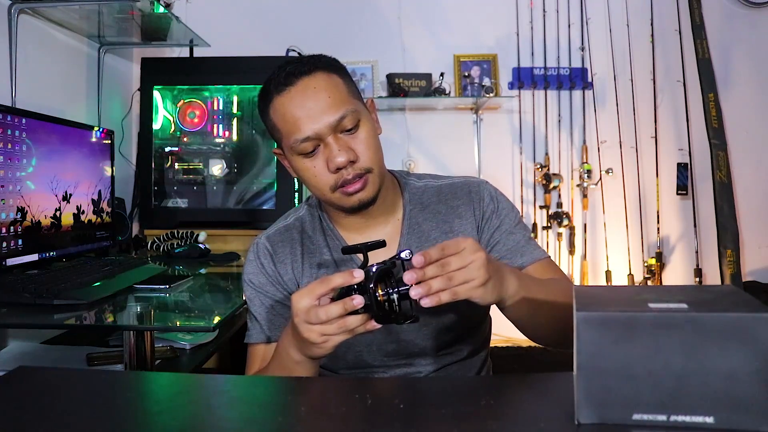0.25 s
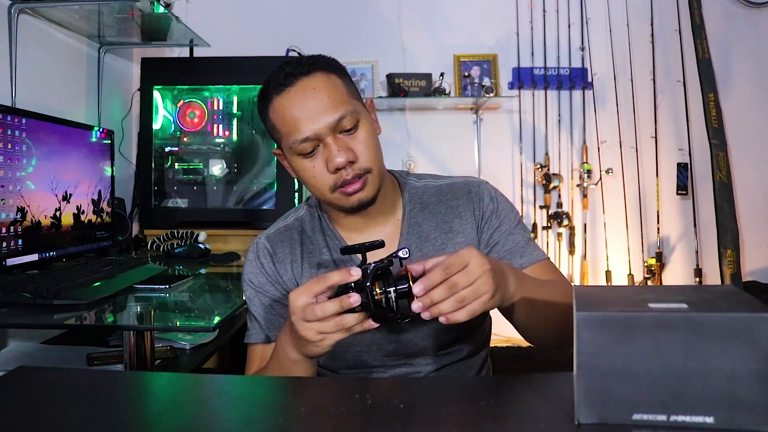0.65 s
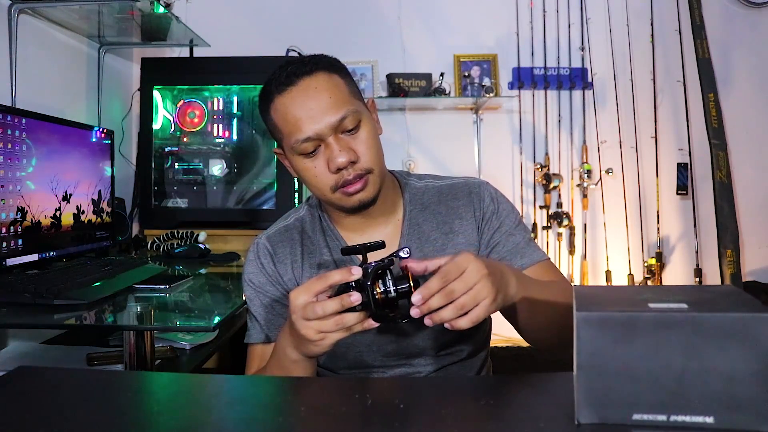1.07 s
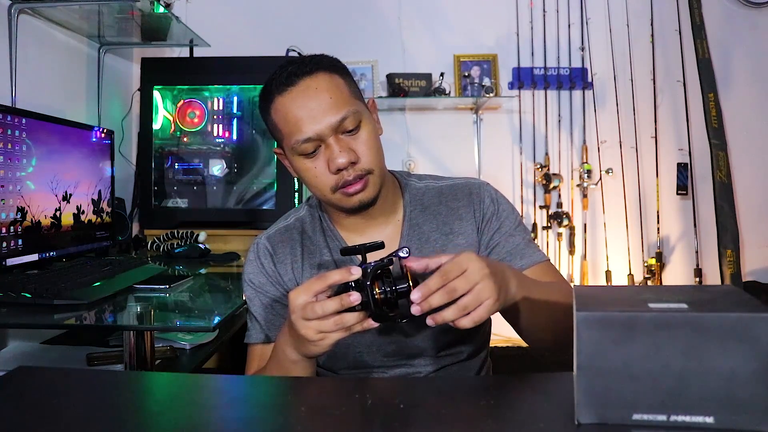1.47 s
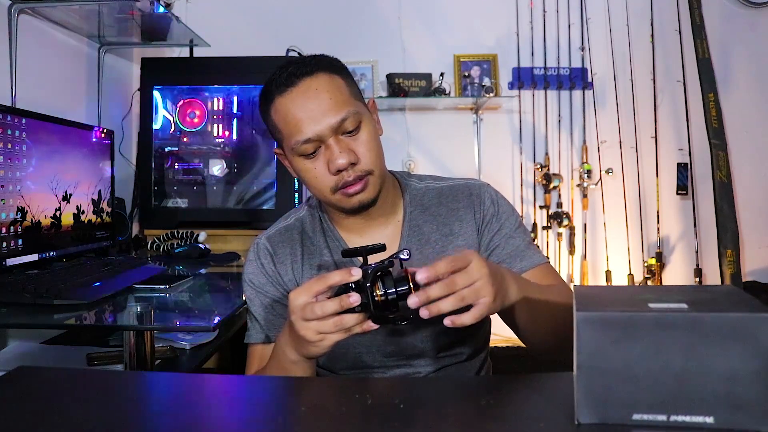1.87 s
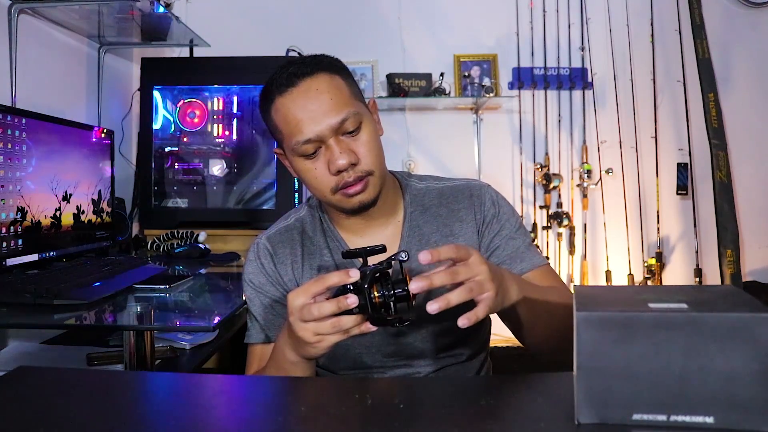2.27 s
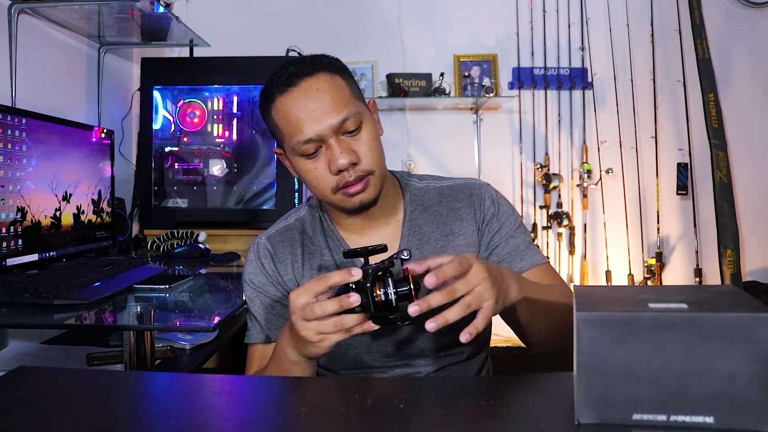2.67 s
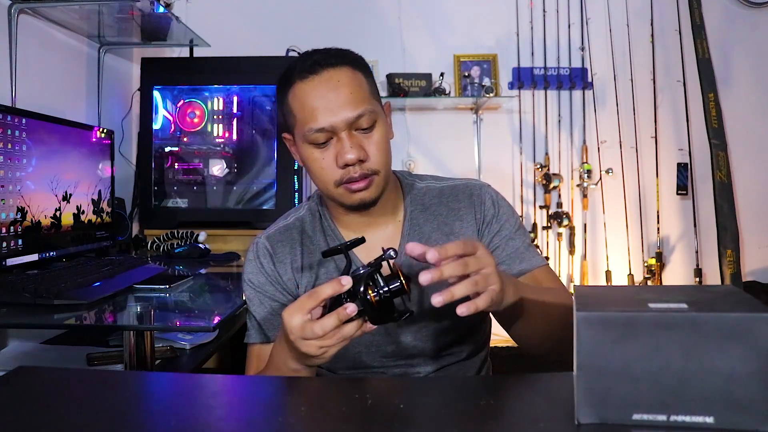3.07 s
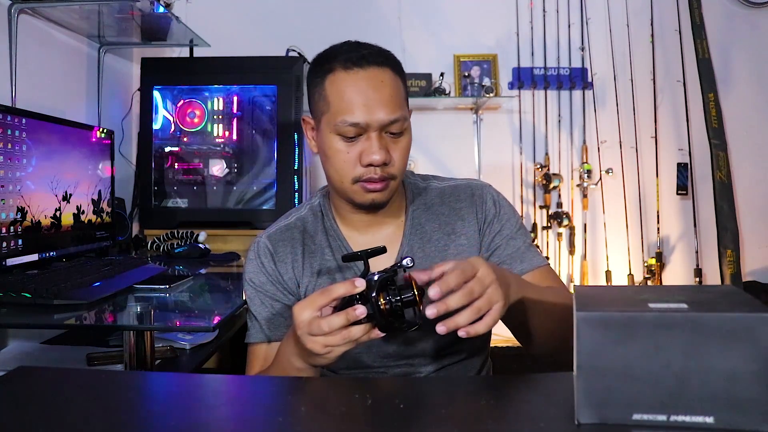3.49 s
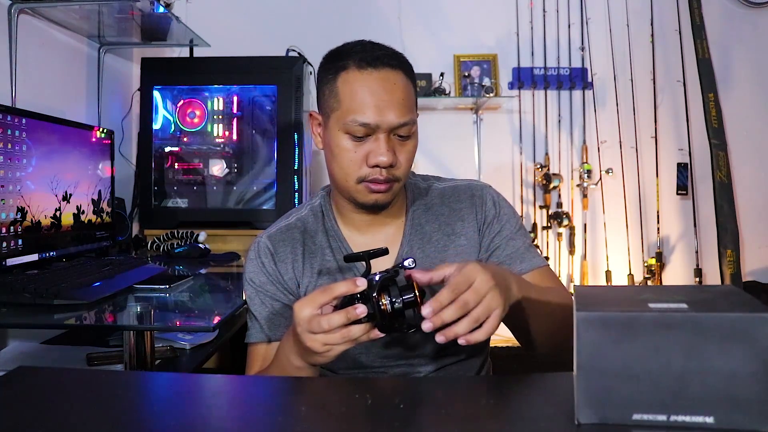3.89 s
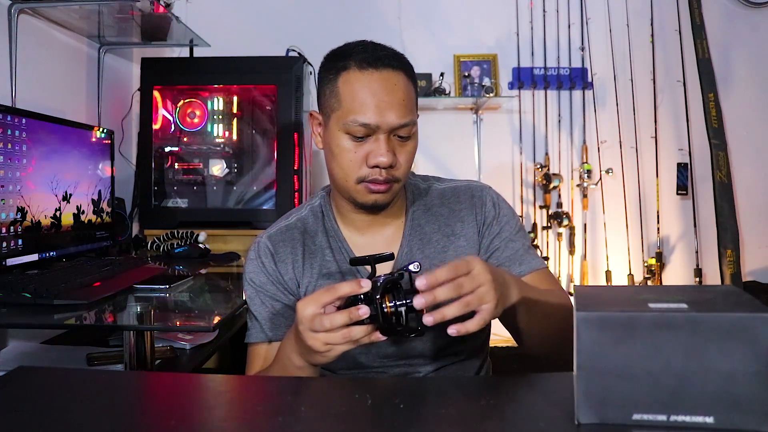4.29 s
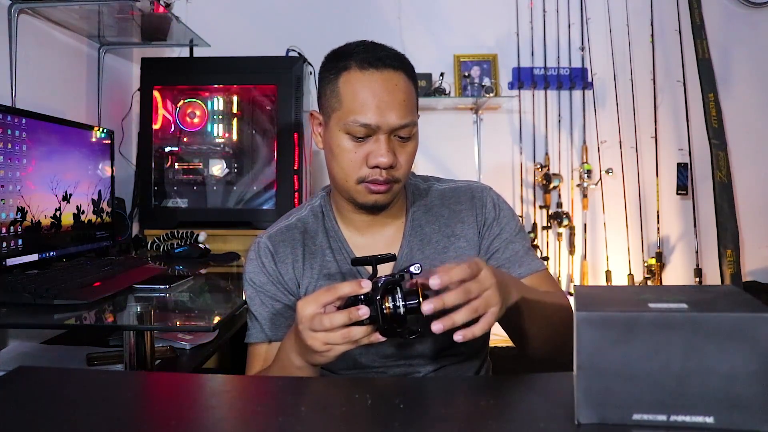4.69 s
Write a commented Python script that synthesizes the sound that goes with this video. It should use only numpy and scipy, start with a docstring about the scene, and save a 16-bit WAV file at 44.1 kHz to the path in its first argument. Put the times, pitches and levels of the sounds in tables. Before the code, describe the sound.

A fishing reel's drag clicks in short, uneven runs with a bright metallic ring, over a soft computer fan hum.

```python
"""Spinning reel drag clicks

A reel's spool is turned by hand in short twists, close to the microphone in a small room.
Each twist takes up the play with faint ticks, then the drag's clicker spring snaps over up to
five teeth and sets the metal spool ringing. Computer fans hum behind.
A compressor ducks briefly after the loud clicks."""
import sys
import numpy as np
from scipy import signal
from scipy.fft import rfft, irfft
from scipy.io import wavfile

SR = 44100
rng = np.random.default_rng(int(sys.argv[2]) if len(sys.argv) > 2 else 0)


def wav_out(sig):
    """Save sig, one row per channel (or a flat mono array), as 16-bit PCM at SR to the path in sys.argv[1]."""
    wavfile.write(sys.argv[1], SR, np.round(np.clip(np.atleast_2d(sig).T, -1, 1) * 32767).astype(np.int16))


N = 218030

# spring slips off a tooth: t/s, snap level/dB, spring t60/s
SNAPS = [(0.168, -19.5, 0.062), (0.2007, -30, .06), (0.2577, -40, .025), (0.288, -56, 0.019),
         (0.3152, -26.5, 0.028), (0.791, -24.5, 0.052), (0.827, -30, 0.037), (0.8524, -31, 0.02),
         (0.8587, -24, 0.061), (0.896, -30, 0.049), (1.2875, -14.5, 0.064), (1.3144, -15, .07),
         (1.3437, -12, 0.056), (1.3877, -17.5, 0.037), (1.6649, -10, 0.083), (1.6828, -11.5, .06),
         (1.7012, -12.5, .025), (1.9695, -14, 0.017), (1.9951, -16, 0.046), (2.0126, -14.5, 0.051),
         (2.0378, -18.5, 0.11), (2.3046, -15.5, 0.066), (2.3254, -18, 0.076), (2.398, -23.5, 0.053),
         (2.5747, -19.5, 0.028), (2.5895, -20, 0.031), (2.608, -25, 0.028), (2.843, -28, 0.024),
         (2.8514, -21, 0.042), (2.875, -17.5, .08), (2.8914, -17.5, 0.13), (2.912, -31.5, 0.077),
         (3.4119, -30.5, 0.061), (3.7487, -9, 0.029), (3.7652, -12, 0.051), (3.784, -10, .025),
         (3.8229, -13, 0.086), (4.0742, -14, .025), (4.089, -12.5, 0.13), (4.104, -12, .06),
         (4.1269, -18, 0.039), (4.375, -28, 0.034), (4.4011, -24, 0.11), (4.4191, -24, 0.033),
         (4.443, -33, 0.04), (4.6887, -33, 0.14), (4.7107, -25.5, 0.021), (4.732, -44, .03)]
# hand twists, and how loudly spring, lip and skirt ring in each:
# t/s, tick level/dB, spring gain/dB, lip level/dB, skirt gain/dB
TWISTS = [(0.146, -47.5, 0, -62, -3), (0.765, -48, -2, -43, -0.5), (1.239, -48, 5.5, -45, 2),
          (1.634, -41.5, -3.5, -47, -1.5), (1.95, -58, 3, -37, -4), (2.276, -40, 0, -29.5, 3.5),
          (2.548, -43.5, 4, -46, 3), (2.83, -56, 0, -33.5, -1), (3.395, -49, -9.5, -54, -0.5),
          (3.721, -35, 0, -49, 2.5), (4.045, -37.5, 2, -40, -2.5), (4.368, -43.5, 0.5, -54, -3.5),
          (4.666, -41.5, 2.5, -46, 1.5)]
# damped reel resonances, in every contact: f/Hz, width/Hz, relative level/dB
BODY_MODES = [(2225, 570, -26.5), (2640, 560, -13), (4360, 330, -20), (5060, 350, -23), (7020, 220, -8),
              (7700, 490, -8.5), (8530, 190, -18), (9080, 140, -4.5), (10260, 170, -2), (10750, 400, -2),
              (11460, 220, -8.5), (12067, 290, 3), (12300, 230, -1.5), (13600, 900, -33),
              (13970, 230, -0.5), (16000, 170, -8.5)]
# high spool modes: f/Hz, level re snap/dB, t60/s
SPOOL_MODES = [(7150, -50, 0.14), (9800, -25.5, 0.3), (11990, -38, 0.09), (12000, -32, 0.14),
               (14270, -31, 0.2)]
# lowest mode of the spool skirt, a close pair: f/Hz, relative level/dB
SKIRT_MODES = [(4067, -39.5), (4085, -45.5)]
# fan air spectrum: f/Hz, relative density/dB
FAN_AIR = [(15, -65), (25, -13), (64, -7.5), (119, -4), (140, -12.5), (169, 1), (193, -7), (281, -12.5),
           (582, -17), (804, -19.5), (1380, -19.5), (1570, -22.5), (2060, -24), (2490, -26), (15500, -34)]
# fan air stereo width: f/Hz, side re mid/dB
FAN_SIDE = [(60, -1), (110, -11), (200, -7), (380, -1.5), (700, -2), (1290, -4), (2380, -3), (4400, -2.5),
            (8120, -3), (15000, -2.5)]
# fan hum lines: f/Hz, width/Hz, relative level/dB
FAN_HUM = [(67.3, 9.2, -55.5), (123, 15, -62), (167.9, 3.6, -57.5), (638, 42, -66)]


def from_db(db):
    return 10 ** (np.asarray(db) / 20)


def unit_rms(x):
    return x / np.sqrt(np.mean(x ** 2) + 1e-20)


def spectrum_gain(points, hz):
    points_hz, db = np.transpose(points)
    return from_db(np.interp(np.log(hz + 1e-9), np.log(points_hz), db))


def seconds(samples):
    return np.arange(samples) / SR


def add(track, at_s, sound):
    i = round(at_s * SR)
    track[i:i + len(sound)] += sound[:N - i]


def decay(t, t60_s):
    return np.exp(-np.log(1000) * t / t60_s)


def ring(t, hz, t60_s):
    return np.sin(2 * np.pi * hz * t) * decay(t, t60_s)


def stereo(mid, side):
    return np.array([mid + side, mid - side])


def resonance(x, hz, width_hz):
    """Two-pole band-pass, unity peak gain."""
    r = np.exp(-np.pi * width_hz / SR)
    feedback = [1, -2 * r * np.cos(2 * np.pi * hz / SR), r * r]
    return signal.lfilter(np.array([1, 0, -1]) * (1 - r * r) / 2, feedback, x)


def twists():
    """Each twist's row with its run of snaps."""
    ends_s = [row[0] for row in TWISTS[1:]] + [N / SR]
    for row, end_s in zip(TWISTS, ends_s):
        yield row, [snap for snap in SNAPS if row[0] <= snap[0] < end_s]


def contact(brightness, chatter_s, bounce_db, bounce_s=0.0019, vary_db=3, pivot_hz=9500, low_cut_hz=1950):
    """Metal hits metal, chatters and bounces once; rms 1 over the first 5 ms."""
    t = seconds(1024)
    since_bounce_s = t - bounce_s * rng.uniform(0.72, 1.15)
    bounce = (since_bounce_s > 0) * np.exp(-np.abs(since_bounce_s) / chatter_s)
    force = (np.exp(-t / chatter_s) + from_db(bounce_db) * bounce) * rng.standard_normal(len(t))
    out = 0
    for hz, width_hz, db in BODY_MODES:
        tilt_db = 1.09 * brightness * np.tanh(2 * np.log2(hz / pivot_hz))
        out += from_db(db + tilt_db + rng.normal(0, vary_db)) * unit_rms(resonance(force, hz, width_hz))
    # a small body radiates little bass
    out = signal.sosfilt(signal.butter(4, low_cut_hz, "high", fs=SR, output="sos"), out)
    return out / np.sqrt(np.mean(out[:SR // 200] ** 2))


def snaps(hard_db=-14.5, brightness_per_db=1.88):
    """The spring tip lands on the next tooth; hard landings are brighter."""
    out = np.zeros(N)
    for at_s, db, _ in SNAPS:
        brightness = -0.5 + brightness_per_db * max(db - hard_db, 0)
        add(out, at_s, from_db(db) * contact(brightness, chatter_s=0.0012, bounce_db=-9))
    return out


def spring(spring_hz=9614, spread_hz=14, base_db=-7.5, snap_share=0.35, ramp_s=0.001,
           twang_db=-7.5, sharp_hz=60, twang_t60_s=0.028, lip_hz=10250, lip_t60_s=0.21):
    """The spring twangs, sharp at first, and rings with the spool's lip until the next tooth stops it."""
    out, t = np.zeros(N), seconds(SR // 2)
    attack = 1 - np.exp(-t / ramp_s)
    for (_, _, spring_gain_db, lip_db, _), run in twists():
        stops_s = [snap[0] for snap in run[1:]] + [N / SR]
        for (at_s, db, t60_s), stop_s in zip(run, stops_s):
            hz = spring_hz + rng.normal(0, spread_hz)  # tip seats differently on each tooth
            length_db = -2.5 * np.log2(t60_s / twang_t60_s)  # longer rings are softer
            gain = from_db(base_db + spring_gain_db + snap_share * db + length_db)
            twang = from_db(twang_db) * ring(t, hz + sharp_hz, twang_t60_s)
            lip = from_db(lip_db) * ring(t, lip_hz, lip_t60_s)
            tone = gain * (ring(t, hz, t60_s) + twang) + lip
            gate = np.clip((stop_s - at_s - t) / ramp_s + 1, 0, 1)
            add(out, at_s, tone * gate * attack)
    return out


def spool(vary_db=0.5, max_lag_s=0.0017):
    """Each snap strikes the spool's high modes with slightly varied strengths."""
    out, t = np.zeros(N), seconds(SR // 2)
    modes = np.array([from_db(db) * ring(t, hz, t60_s) for hz, db, t60_s in SPOOL_MODES])
    for at_s, db, _ in SNAPS:
        lag_s = rng.uniform(0, max_lag_s)
        gains = from_db(db + rng.normal(0, vary_db, len(modes)))
        add(out, at_s + lag_s, gains @ modes)
    return out


def skirt(snap_share=0.46, swell_s=0.014, t60_s=0.48):
    """The skirt gathers energy snap by snap and rings like a small bell; its two modes beat."""
    energy, t = np.zeros(N), seconds(SR // 2)
    pulse = (1 - np.exp(-t / swell_s)) * decay(t, t60_s)
    since_snap_s = seconds(N)
    for (*_, skirt_gain_db), run in twists():
        for at_s, db, _ in run:
            add(energy, at_s, (from_db(snap_share * db + skirt_gain_db) * pulse) ** 2)
            i = round(at_s * SR)
            since_snap_s[i:] = seconds(N - i)
    # each snap restarts the pair in antiphase
    pair = sum(sign * from_db(db) * np.sin(2 * np.pi * hz * since_snap_s)
               for sign, (hz, db) in zip((1, -1), SKIRT_MODES))
    return np.sqrt(energy) * pair


def scrapes(level_db=-44.5, vary_db=1.5, climb_s=0.012, grains=3, max_gap_s=0.05):
    """Between close snaps the spring tip grits up the tooth's flank."""
    out = np.zeros(N)
    snaps_s = np.array(SNAPS)[:, 0]
    for at_s in snaps_s[1:][np.diff(snaps_s) < max_gap_s]:
        leads_s = rng.uniform(0, climb_s, grains)
        for lead_s, db in zip(leads_s, rng.normal(level_db, vary_db, grains)):
            grain = contact(brightness=-7, chatter_s=0.0019, bounce_db=-9.5)
            add(out, at_s - lead_s, from_db(db) * grain)
    return out


def play_ticks(seat_share=0.55, seat_gain_db=-2, let_go_after_s=0.085, let_go_db=-53):
    """Dull ticks of the spool on its shaft: gripped, seated, let go."""
    out = np.zeros(N)
    for (start_s, tick_db, *_), run in twists():
        seat_s = start_s + seat_share * rng.uniform(0.8, 1.2) * (run[0][0] - start_s)
        let_go_s = run[-1][0] + let_go_after_s * rng.uniform(0.8, 1.3)
        for at_s, db in [(start_s, tick_db), (seat_s, tick_db + seat_gain_db), (let_go_s, let_go_db)]:
            add(out, at_s, from_db(db) * contact(brightness=-13.5, chatter_s=0.0017, bounce_db=0))
    return out


def off_axis(x, lead_s=5e-6, shade_db=-1, shade_hz=12000):
    """Sound reaches the left capsule earlier but duller."""
    hz = np.fft.rfftfreq(N, 1 / SR)
    split = np.array([[0.5], [-0.5]])
    arrival = np.exp(2j * np.pi * hz * lead_s * split)
    shade = from_db(shade_db * (hz / shade_hz) ** 2 * split)
    return irfft(rfft(x) * arrival * shade, N)


def reflections(x, wet_db, t60_s, side_db, first_s, cutoff_hz):
    """Dense echoes, similar at both capsules; air and walls absorb the top."""
    t = seconds(SR // 2)
    mid, side = rng.standard_normal((2, len(t))) * decay(t, t60_s) * (t > first_s)
    response = stereo(mid, from_db(side_db) * side) / np.sqrt(np.sum(mid ** 2))
    response = signal.sosfilt(signal.butter(2, cutoff_hz, fs=SR, output="sos"), response)
    return from_db(wet_db) * signal.fftconvolve(x[None], response, axes=1)[:, :N]


def fans(air_db=-49, hum_gain_db=-0.5, hum_side_db=-10, left_re_right_db=-1.5):
    """Diffuse rush of air with wavering hum lines."""
    hz = np.fft.rfftfreq(N, 1 / SR)
    mid, side = rfft(rng.standard_normal((2, N))) * spectrum_gain(FAN_AIR, hz)
    mid, side = irfft(mid, N), irfft(side * spectrum_gain(FAN_SIDE, hz), N)
    out = from_db(air_db) * stereo(mid, side) / np.std(mid)
    for line_hz, width_hz, db in FAN_HUM:
        line = 1 / (1 + ((hz - line_hz) / width_hz) ** 2)
        mid, side = unit_rms(irfft(rfft(rng.standard_normal((2, N))) * line, N))
        out += from_db(db + hum_gain_db) * stereo(mid, from_db(hum_side_db) * side)
    return out * from_db([[left_re_right_db / 2], [-left_re_right_db / 2]])


def scene():
    """Close reel, desk and room echoes, fans behind."""
    contacts = snaps() + scrapes() + play_ticks()
    spring_ring, spool_ring = spring(), spool()
    direct = off_axis(contacts + spring_ring + spool_ring + skirt())
    desk = reflections(contacts, wet_db=-10.5, t60_s=0.04, side_db=-12, first_s=0.0016, cutoff_hz=12900)
    room_send = contacts + from_db(-3.5) * spring_ring + spool_ring
    room = reflections(room_send, wet_db=-17.5, t60_s=0.33, side_db=-4, first_s=0.0089, cutoff_hz=13300)
    return direct + desk + room + fans()


def record(dry, threshold_db=-15, slope=0.31, release_db_per_s=330, attack_s=0.0021, cutoff_hz=15900):
    """A compressor passes each snap and ducks what follows; then clipping and low-pass."""
    fall_db = release_db_per_s * seconds(N)
    peak_db = 20 * np.log10(np.abs(dry).max(axis=0) + 1e-9)
    held_db = np.maximum.accumulate(peak_db + fall_db) - fall_db
    pole = np.exp(-1 / (attack_s * SR))
    duck_db = signal.lfilter([1 - pole], [1, -pole], slope * np.maximum(held_db - threshold_db, 0))
    low_pass = signal.ellip(10, 0.3, 70, cutoff_hz, fs=SR, output="sos")
    return signal.sosfilt(low_pass, np.clip(dry * from_db(-duck_db), -1, 1))


dry = scene()
out = record(dry)
wav_out(out)
```